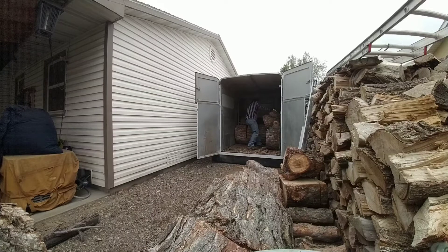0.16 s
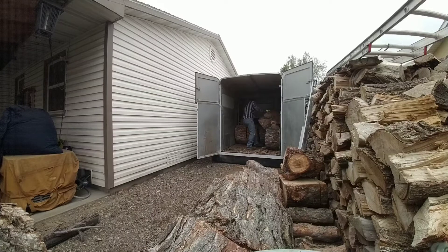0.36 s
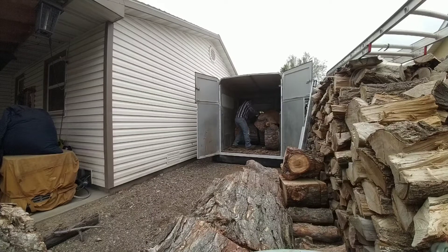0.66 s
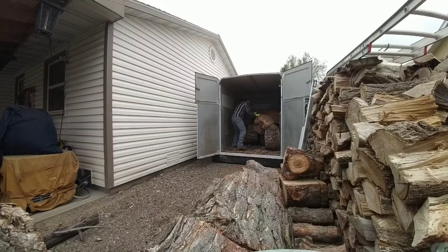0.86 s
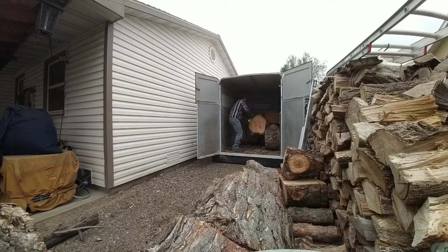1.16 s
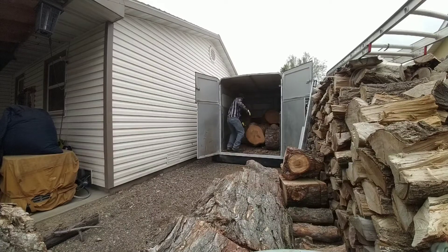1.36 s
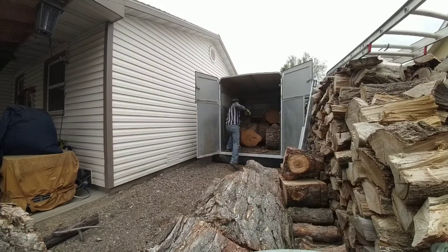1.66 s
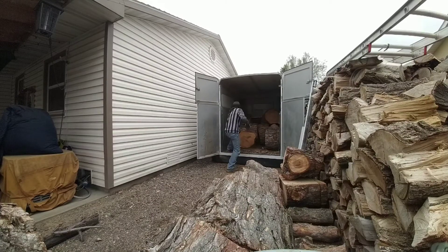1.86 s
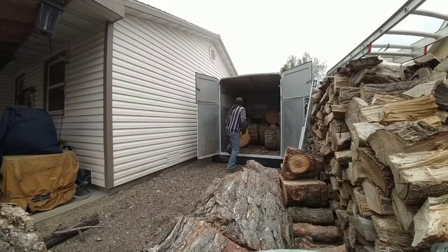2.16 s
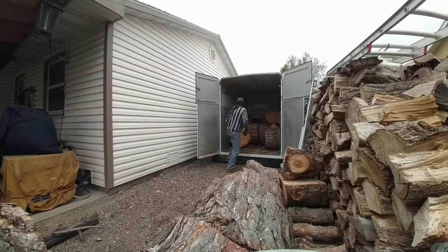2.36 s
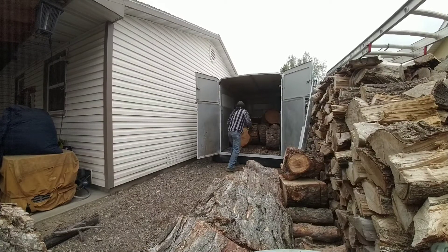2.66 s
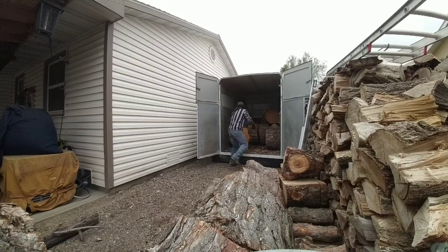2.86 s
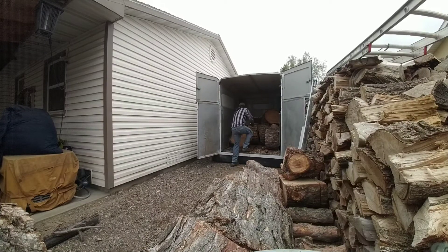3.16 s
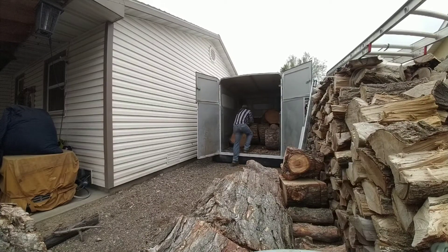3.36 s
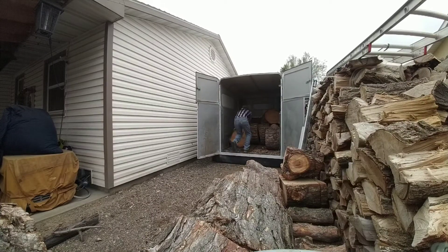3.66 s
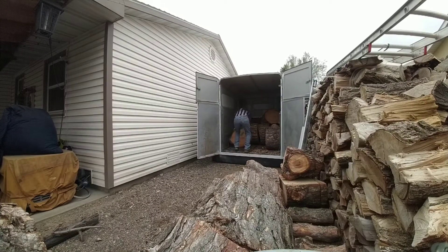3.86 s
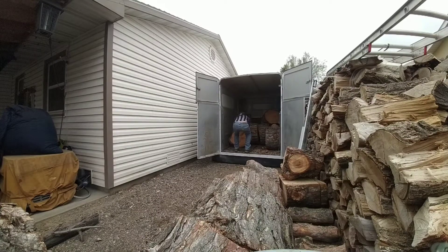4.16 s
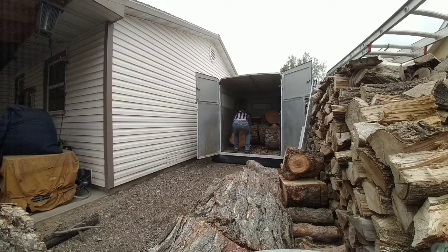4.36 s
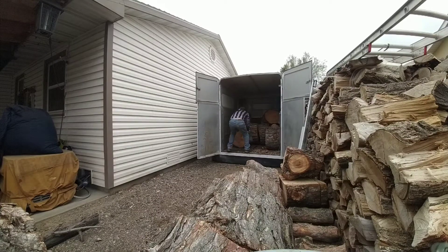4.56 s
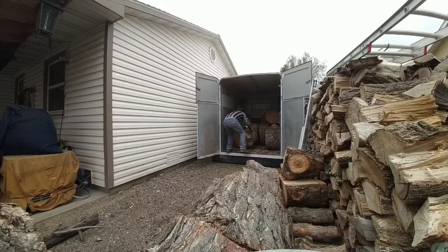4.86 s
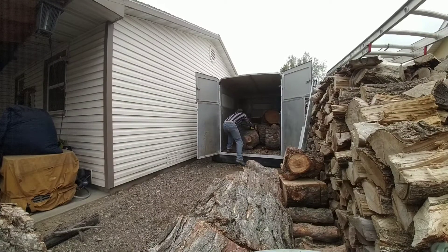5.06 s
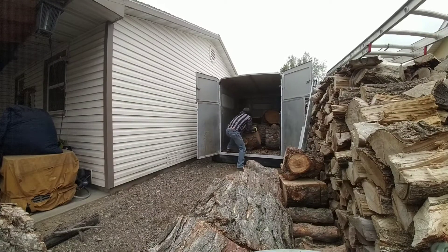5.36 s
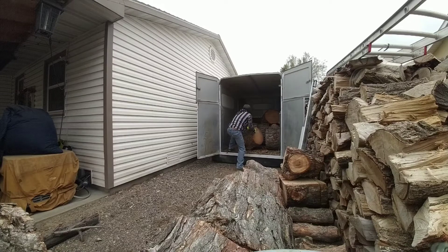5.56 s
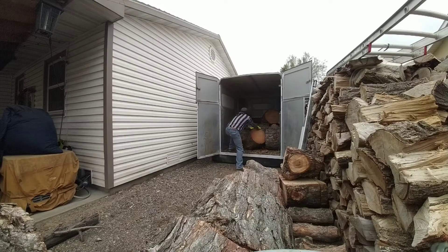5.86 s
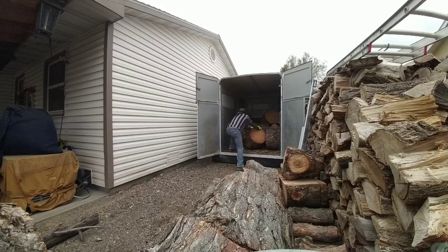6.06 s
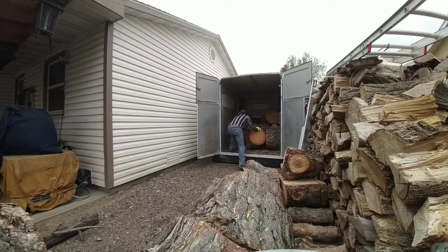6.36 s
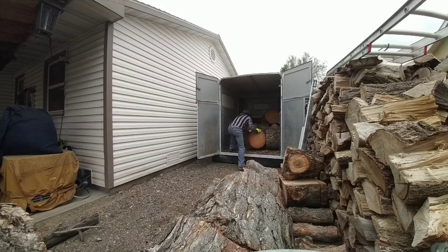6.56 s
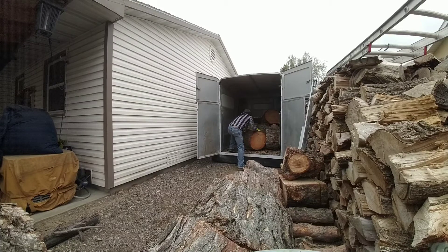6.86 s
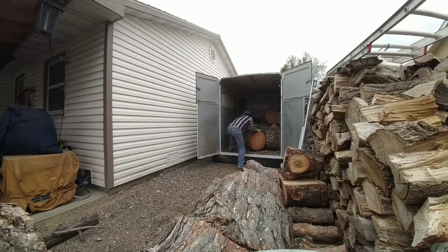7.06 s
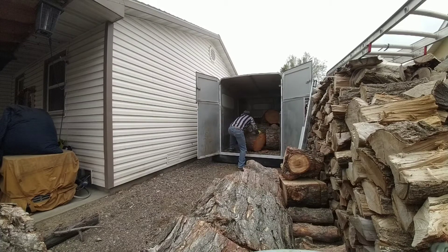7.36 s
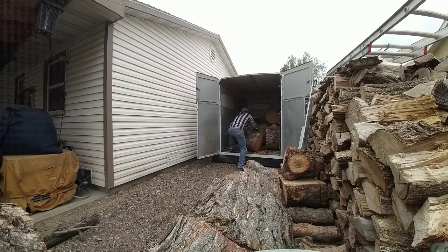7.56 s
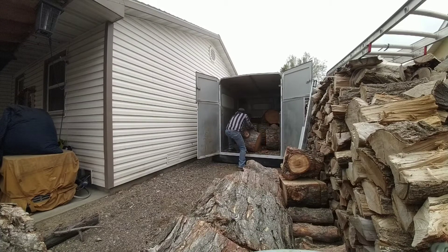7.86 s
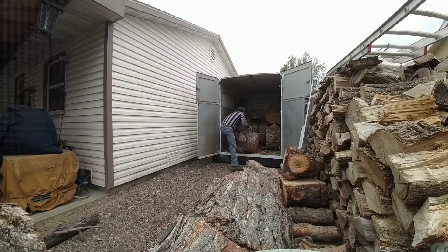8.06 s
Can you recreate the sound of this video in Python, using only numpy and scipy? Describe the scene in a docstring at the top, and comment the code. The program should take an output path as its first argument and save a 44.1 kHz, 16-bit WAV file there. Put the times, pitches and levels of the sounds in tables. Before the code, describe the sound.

Outdoors, at a distance from an open box trailer, soft low air noise and a faint far engine hum run throughout. From about 0.1 to 1.4 s, heavy wood drags and starts rolling: gritty bark scrapes, low floor bumps and dry snaps. At about 1.5 s a loud crack and heavy thud hit the hollow floor, with deep rumbling; further booms come around 1.7 and 1.9 s, and the strongest near 2.1 s, tumbling on to 2.4 s with short boxy echoes. A loose metal part rattles lightly at 2.5-2.9 s. The hum dips in pitch around 2.5 s, then climbs back. Softer knocks and scuffs come at 3.2 and 3.9 s, a sharp snap at 4.6 s, a cluster of clicks and scrapes around 5.2 s, and two faint creaks near 5.5-5.7 s. Small thumps follow at 5.9 and 6.5 s, then sparse ticks, rubs and low bumps until about 8.2 s.

```python
"""Log rounds worked on a box trailer's floor, across a yard: air noise, far engine hum dipping then rising in pitch.
0-1.4 s: dragging and rolling begin (shaken floor modes, scraped bark modes) under snaps (noise bursts).
1.5-2.4 s: the heaviest thuds (contact pulses through floor modes) and rumble; the box echoes (delay loops).
2.5-2.9 s: a loose metal part rattles (decaying sines); then sparser thuds, scrapes and snaps,
with two faint creaks (gliding sines) near 5.5 s."""
import sys
import numpy as np
from scipy import signal
from scipy.io import wavfile
from scipy.ndimage import uniform_filter1d

SR = 44100
rng = np.random.default_rng(int(sys.argv[2]) if len(sys.argv) > 2 else 0)


def store_wav(level_fs):
    """Save 16-bit WAV to argv[1]."""
    pcm = np.round(np.clip(np.atleast_2d(level_fs), -1, 1) * 32767)
    wavfile.write(sys.argv[1], SR, pcm.T.astype(np.int16))


N = 362061


def from_db(db):
    """Decibels to gain."""
    return 10 ** (np.asarray(db) / 20)


def rms_one(x):
    """Scale to unit rms."""
    return x / np.sqrt(np.mean(x ** 2) + 1e-20)


def in_time(rows):
    """Columns of a timed table, interpolated to one value a sample."""
    s, *columns = np.transpose(rows)
    return [np.interp(np.arange(N) / SR, s, c) for c in columns]


def drift(rate_hz):
    """Slow random curve of unit rms: low-passed noise made at SR / 40."""
    r = np.exp(-80 * np.pi * rate_hz / SR)
    noise = rng.standard_normal(N // 40 + 2002)
    slow = signal.lfilter([1], [1, -2 * r, r * r], noise)[2000:]   # settling dropped
    return np.interp(np.arange(N) / 40, np.arange(len(slow)), rms_one(slow))


def resonate(x, hz, width_hz):
    """One two-pole resonance with unit peak gain."""
    r = np.exp(-np.pi * width_hz / SR)
    zeros = np.array([1, 0, -1]) * (1 - r * r) / 2
    poles = [1, -2 * r * np.cos(2 * np.pi * hz / SR), r * r]
    return signal.lfilter(zeros, poles, x)


def body(x, modes):
    """Resonances in parallel, signs alternating."""
    return sum((-1) ** k * from_db(db) * resonate(x, hz, width)
               for k, (hz, width, db) in enumerate(modes))


def cut(x, hz, kind):
    """Second-order high- or low-pass."""
    hz = np.clip(hz, 20, .45 * SR)
    return signal.sosfilt(signal.butter(2, hz, kind, fs=SR, output="sos"), x)


def grains(per_s, spread_db):
    """Random contacts of uneven size and sign, at unit rms."""
    sizes = from_db(spread_db * np.minimum(rng.exponential(1, N), 5))
    signed = sizes * rng.choice([-1, 1], N)
    return rms_one(signed * (rng.random(N) < per_s / SR) + 1e-18)


def evened(x, span_s):
    """Partly level the chance swells, so that the load sets the loudness; unit rms."""
    power = uniform_filter1d(x ** 2, round(span_s * SR))
    return rms_one(x / (power + 1e-3) ** 0.12)


def add(out, s, sound):
    """Mix a short sound in at time s."""
    i = round(s * SR)
    out[i:i + len(sound)] += sound[:N - i]


SLOW_START = 0.14   # share of the held time added to the rise


def swells(steady_db, start_s, held_s, peak_db, min_rise_s, fade_db_per_s):
    """Gain over time: each event rises, holds and fades; powers add to the steady level."""
    power, t = from_db(2 * steady_db), np.arange(SR) / SR
    for s, hold, db in zip(start_s, held_s, peak_db):
        rise = np.minimum(t / (min_rise_s + SLOW_START * hold), 1)
        fade_db = fade_db_per_s * np.maximum(t - min_rise_s - hold, 0)
        add(power, s, (rise * from_db(db - fade_db)) ** 2)
    return np.sqrt(power)


# air noise density: (f/Hz, relative level per Hz/dB)
AIR_SPECTRUM = [(15, -36), (25, -24), (48, -12.5), (70, -3.5), (108, -6.5), (363, -16), (1520, -36),
                (5430, -36.5), (14800, -38.5), (16000, -40)]
AIR_RMS_DB = -50


def air():
    """Steady outdoor noise in half-octave bands, each swaying gently."""
    out, edges_hz, table = 0, 22 * 2 ** np.arange(0, 9.6, .5), np.array(AIR_SPECTRUM)
    white = rng.standard_normal((2, N))
    for k, (low, high) in enumerate(zip(edges_hz, edges_hz[1:])):
        bandpass = signal.butter(2, [low, high], "band", fs=SR, output="sos")
        band = signal.sosfilt(bandpass, white[k % 2])
        db = np.interp(np.log(low * high) / 2, np.log(table[:, 0]), table[:, 1])
        out = out + from_db(db + 0.19 * drift(15)) * band
    return from_db(AIR_RMS_DB) * rms_one(out)


# far engine: (t/s, firing f/Hz, first-order rms level/dB, second-order rms level/dB)
ENGINE_ORDERS = [(0, 61.2, -39, -75), (2.5, 50.76, -78, -37.5), (2.95, 52.56, -36.5, -61),
                 (3.4, 53.94, -33, -52.5), (4.1, 57.65, -39, -46), (4.6, 59.57, -42, -51.5),
                 (5.2, 59.05, -41, -63), (6.0, 60.5, -45.5, -51), (7.0, 61.67, -45.5, -110),
                 (8.21, 61.9, -63, -69)]


def engine():
    """The two lowest orders carry over the distance, wavering a little in pitch and level."""
    hz, first_db, second_db = in_time(ENGINE_ORDERS)
    phase = 2 * np.pi * np.cumsum(hz * (1 + .007 * drift(4))) / SR
    first = from_db(first_db + 1.5 * drift(4)) * np.sin(phase)
    second = from_db(second_db + 3 * drift(9)) * np.sin(2 * phase)
    return np.sqrt(2) * (first + second)   # rms to peak


# wood under load: (t/s, length/s, start f/Hz, end f/Hz, peak level/dB)
CREAK_GLIDES = [(5.522, 0.13, 1850, 1710, -54), (5.65, 0.044, 1630, 1950, -54)]


def creaks():
    """Short wavering tones that swell and fade."""
    out, waver = np.zeros(N), drift(3.3)
    for s, length_s, start_hz, end_hz, db in CREAK_GLIDES:
        hz = np.linspace(start_hz, end_hz, round(length_s * SR))
        hz = hz * (1 + 0.015 * waver[round(s * SR):][:len(hz)])
        tone = np.sin(2 * np.pi * np.cumsum(hz) / SR)
        add(out, s, from_db(db) * np.sqrt(np.hanning(len(hz))) * tone)
    return out


# loose metal part touched as the log settles: (t/s, level/dB)
RATTLE_TOUCHES = [(2.547, -41), (2.651, -45), (2.691, -41), (2.752, -47), (2.854, -44)]
# its modes: (f/Hz, relative level/dB, t60/s)
METAL_MODES = [(2550, -4.5, 0.09), (1680, -13, 0.065), (1140, -1, 0.063)]


def rattles():
    """Each touch rings the part's few modes, each with a random strength."""
    out, t = np.zeros(N), np.arange(SR // 5) / SR
    chance = rng.standard_normal((len(RATTLE_TOUCHES), len(METAL_MODES)))
    for (s, db), lucks in zip(RATTLE_TOUCHES, chance):
        for (hz, mode_db, t60), luck in zip(METAL_MODES, lucks):
            decay = from_db(db + mode_db + 1.7 * luck - 60 * t / t60)
            add(out, s, decay * np.sin(2 * np.pi * hz * t))
    return out


# bark and splinters: (t/s, level/dB before a common -13 dB, f/Hz, t60/s, crackle over wood/dB)
SNAP_EVENTS = [(0.312, -11.5, 1400, 0.061, -1), (0.596, -27, 3210, 0.09, -3), (0.65, -21, 3820, 0.096, 9),
               (0.682, -7, 2950, 0.044, -8), (0.727, -12, 1510, 0.043, -15), (0.929, -17, 1880, 0.17, -21),
               (1.035, -13, 1900, 0.056, -5), (1.098, -9.5, 2540, 0.089, -10), (1.236, -17, 2470, 0.1, -12),
               (1.3034, -8, 1450, 0.047, -29), (1.36, -11.5, 2900, 0.1, 11), (1.416, -10, 3040, 0.055, -3),
               (1.447, -12, 3370, 0.046, -18), (1.4674, 4, 1800, 0.069, -14), (1.507, -7, 2930, 0.21, -16),
               (1.5395, -6, 1680, 0.19, 0.5), (1.636, -6, 970, 0.12, -25), (1.7113, -11, 1850, 0.12, 0),
               (2.001, -16.5, 1730, 0.13, -1), (2.052, -7.5, 1960, 0.1, 0), (2.147, -6, 2200, 0.12, -14),
               (2.185, -8.5, 1680, 0.056, -0.5), (2.241, -6, 855, 0.1, -7), (2.3218, -7.5, 1400, 0.1, -1),
               (3.2204, -18, 1060, 0.07, -10), (3.5703, -21, 2230, 0.056, 7), (3.588, -18, 2180, 0.052, 3),
               (3.673, -24.5, 2250, 0.097, 2.5), (3.775, -27, 2450, 0.023, 11.5),
               (3.782, -27.5, 800, 0.068, 0), (3.795, -23, 2450, 0.051, 5), (3.9148, -17, 1670, 0.17, -18),
               (4.0118, -23, 3640, 0.34, 0.5), (4.173, -30, 1750, 0.1, 8), (4.3, -47, 1510, 0.057, 14),
               (4.5593, -11.5, 3300, 0.055, -4), (4.561, -19, 2200, 0.074, -20),
               (4.639, -36.5, 1600, 0.33, 17), (4.855, -21, 1890, 0.079, -2), (4.909, -23, 2720, 0.12, -2),
               (4.953, -19.5, 2380, 0.071, -23), (5.041, -22.5, 2300, 0.08, -49),
               (5.1226, -24.5, 2434, 0.39, 0), (5.1572, -9.5, 2390, 0.021, -18),
               (5.1635, -7, 2270, 0.048, -25), (5.18, -14.5, 4600, 0.048, -1), (5.2481, -14, 2300, 0.02, 7),
               (5.2593, -19, 3450, 0.015, -4), (5.3386, -29.5, 2550, 0.12, 11),
               (5.521, -32, 1773, 0.072, 7), (5.6152, -24.5, 3170, 0.13, -11),
               (5.6395, -28.5, 1625, 0.15, 16), (5.7676, -21, 2200, 0.06, -20),
               (5.91, -23.5, 2400, 0.036, -20), (6.031, -30, 2380, 0.036, -7),
               (6.102, -41, 2400, 0.12, 20.5), (6.1599, -23.5, 2490, 0.044, -24),
               (6.499, -16.5, 1590, 0.042, -27), (6.5455, -16, 2220, 0.04, -19),
               (7.1085, -33, 2780, 0.041, -9), (7.183, -22.5, 3170, 0.036, -20),
               (7.187, -21.5, 2000, 0.085, -26), (7.2493, -24, 2250, 0.23, -1),
               (7.447, -23, 1500, 0.033, -3), (7.472, -20, 1500, 0.027, -4), (7.548, -16.5, 3830, 0.023, 4),
               (7.643, -22, 1920, 0.075, -6), (7.7462, -29, 2370, 0.04, 3), (7.8532, -42, 1510, 0.052, 12),
               (7.945, -36, 1810, 0.056, 10), (8.089, -19.5, 2440, 0.05, 6.5)]
SNAP_TRIM_DB, CRACKLE_RISE_S = -13, .003


def snaps():
    """A short burst: part rings two modes of the wood, part is bright crackle of its own colour."""
    out, t = np.zeros(N), np.arange(SR // 5) / SR
    # (crackle f/Hz, upper mode over lower)
    colours = rng.uniform([5500, 1.3], [20000, 1.7], (len(SNAP_EVENTS), 2))
    noises = rng.standard_normal((len(SNAP_EVENTS), 2, SR // 5))
    for (s, db, hz, t60, crackle_db), noise, (crackle_hz, upper) in zip(SNAP_EVENTS, noises, colours):
        fibres = noise * np.abs(noise) / 2 * from_db(-60 * t / t60)   # squaring makes them uneven
        wood, crackle = fibres + 4 * (t == 0)   # the break itself is a click
        lower_mode = resonate(wood, hz, 0.2 * hz)
        wood = lower_mode - from_db(-6) * resonate(wood, upper * hz, 0.25 * hz)
        crackle = cut(crackle * (1 - np.exp(-t / CRACKLE_RISE_S)), 2300, "high")
        crackle = resonate(crackle, crackle_hz, 7500)
        burst = wood / np.abs(wood).max() + from_db(crackle_db) * crackle / np.abs(crackle).max()
        add(out, s, from_db(db + SNAP_TRIM_DB) * burst)
    return out


# how hard the wood is worked: (t/s, floor rumble level/dB, bark scrape level/dB); also drives rolling()
WORK_LEVELS = [(0, -49.5, -57.5), (0.18, -57.5, -50.5), (0.3, -39.5, -41), (1.0, -44.5, -43),
               (1.45, -43, -37.5), (1.475, -19.5, -33), (1.76, -23.5, -35), (1.99, -35.5, -50.5),
               (2.12, -31, -36), (2.16, -23, -30.5), (2.33, -21.5, -40), (2.55, -35, -50), (2.93, -56, -54),
               (4.8, -56, -55.5), (5.3, -46.5, -49.5), (6.1, -50, -54), (6.9, -57.5, -56),
               (7.45, -48.5, -50), (7.9, -55, -58), (8.21, -42.5, -47.5)]
# bark over wood and metal: (t/s, held/s, scrape level/dB, hiss over scrape/dB)
RUB_EVENTS = [(0.13, 0.044, -47.5, -5), (0.204, 0.023, -37, -2), (0.27, 0.035, -36, -5),
              (0.678, 0.0041, -34.5, 3), (0.72, 0.045, -35.5, -2.5), (0.845, 0.033, -32.5, -5.5),
              (1.02, 0.11, -36, -5), (1.089, 0.016, -37.5, 4.5), (1.21, 0.016, -49, 7.5),
              (1.251, 0.021, -35.5, -19), (1.303, 0.014, -51, -24), (1.362, 0.13, -42, 8.5),
              (1.9, 0.017, -37.5, -8), (2.0, 0.037, -46.5, -1), (2.034, 0.057, -34.5, -3.5),
              (2.26, 0.061, -48, -3), (2.68, 0.028, -54, -15), (3.218, 0.0087, -41.5, 2.5),
              (3.57, 0.021, -53.5, 3.5), (3.912, 0.021, -51, 2), (4.065, 0.032, -48, 3),
              (4.168, 0.0051, -45.5, 1.5), (4.449, 0.14, -52.5, 2), (4.559, 0.06, -47.5, -0.5),
              (4.85, 0.087, -48, 1.5), (5.148, 0.02, -39, 3.5), (5.248, 0.0075, -46, 4),
              (5.31, 0.079, -52, -2), (5.631, 0.13, -47.5, -10), (5.739, 0.073, -47, -8),
              (5.869, 0.15, -52.5, -1), (6.463, 0.013, -47.5, -4.5), (6.497, 0.026, -44, -3.5),
              (6.544, 0.011, -37.5, -4.5), (7.18, 0.014, -48, -14), (7.372, 0.13, -50, -3),
              (7.543, 0.006, -42, -1), (7.64, 0.025, -44.5, -14), (8.085, 0.055, -43.5, -1)]
# bark and wood under a scrape: (f/Hz, width/Hz, relative level/dB)
SCRAPE_MODES = [(720, 380, 7), (1000, 360, 7.5), (1400, 350, 8), (1850, 420, 7.5), (2300, 590, -0.5),
                (2650, 910, 3.5), (3380, 550, -2.5)]
# edges of the bands in which grit hisses: f/Hz
GRIT_EDGES_HZ = [3820, 4760, 8500, 11100, 17600]
HISS_OVER_SCRAPE_DB = -4.5   # between rubs
CHIPS_PER_S, CHIPS_DB = 81, -12   # loose bark knocking about, level against slips or grit
PATCHY_DB = 3   # rms swell of each bark mode
RUB_MIN_RISE_S, RUB_FADE_DB_PER_S = .008, 282


def dragging():
    """Dense slips and loose chips ring the bark's modes by turns; the finest grit hisses in patches."""
    work_db = in_time(WORK_LEVELS)[1]
    s, hold, scrape_db, hiss_db = np.transpose(RUB_EVENTS)
    clumps = drift(19)
    grit = grains(9000., spread_db=2.0) + from_db(CHIPS_DB) * grains(150., spread_db=4.0)
    slips = grains(3500., spread_db=2.0) + from_db(CHIPS_DB) * grains(CHIPS_PER_S, spread_db=4.5)

    scrape = 0
    for k, (hz, width, db) in enumerate(SCRAPE_MODES):
        contacts = np.roll(slips, k * N // 8)   # different contacts per mode
        swell = from_db(db + PATCHY_DB * drift(14.5))
        scrape = scrape + (-1) ** k * swell * resonate(contacts, hz, width)
    scrape = evened(rms_one(cut(scrape, 5300, "low")), 0.086)

    hiss = 0
    for low, high in zip(GRIT_EDGES_HZ, GRIT_EDGES_HZ[1:]):
        patches = from_db(1.0 * clumps + 2.8 * drift(9.9))
        hiss = hiss + patches * cut(cut(grit, low, "high"), high, "low")
    hiss = evened(rms_one(hiss), 0.12)

    shape = RUB_MIN_RISE_S, RUB_FADE_DB_PER_S
    hiss = hiss * swells(work_db + HISS_OVER_SCRAPE_DB, s, hold, scrape_db + hiss_db, *shape)
    return hiss + scrape * swells(work_db, s, hold, scrape_db, *shape)


# weight shifting onto the floor: (t/s, held/s, boom level/dB, rumble level/dB)
LURCH_EVENTS = [(0.13, 0.05, -44, -67), (0.21, 0.022, -25.5, -46), (0.27, 0.035, -33, -42),
                (0.36, 0.037, -29.5, -45), (0.565, 0.035, -27, -35), (1.05, 0.071, -34.5, -37),
                (1.22, 0.035, -34, -38), (1.36, 0.033, -33, -31.5), (1.46, 0.0082, -10, -10.5),
                (1.72, 0.1, -18, -47), (1.919, 0.059, -17, -35.5), (2.13, 0.017, -12.5, -27),
                (2.22, 0.022, -33, -36), (2.36, 0.077, -19, -30), (2.55, 0.23, -30.5, -58),
                (2.971, 0.035, -38, -41), (3.221, 0.035, -25.5, -36.5), (3.52, 0.016, -42, -45),
                (3.76, 0.058, -49, -47), (3.909, 0.03, -30, -33.5), (5.151, 0.11, -47, -40),
                (5.39, 0.071, -38, -44), (5.638, 0.044, -38, -59), (5.87, 0.074, -31, -44),
                (6.05, 0.049, -41, -43), (6.489, 0.074, -46, -43), (6.669, 0.076, -49, -44),
                (6.9, .12, -44, -71), (7.44, 0.04, -53, -39.5), (7.6, 0.059, -39, -62),
                (8.13, 0.1, -44, -42)]
# floor and walls as a drum: (f/Hz, width/Hz, relative level/dB); also rung by thuds()
DRUM_MODES = [(41, 3.1, -27), (51.56, 2.66, 8.5), (67.9, 8.6, 0), (80.5, 12.2, -4.5)]
# planks and panels: (f/Hz, width/Hz, relative level/dB); also rung by thuds()
PLANK_MODES = [(108, 15, -10), (146, 57.5, 9), (191.3, 27, -6), (275, 3.5, 7), (315, 56, 3), (393, 70, 1.5),
               (500, 76, -8), (602, 320, -5), (799, 110, -8.5), (940, 360, -16.5), (1450, 650, -14.5)]
BOOM_OVER_RUMBLE_DB = 2   # between lurches
BOOM_MIN_RISE_S, BOOM_FADE_DB_PER_S = 0.031, 230
RUMBLE_MIN_RISE_S, RUMBLE_FADE_DB_PER_S = 0.0035, 281


def rolling():
    """Bark ridges bump over the floor and shake its drum and plank modes."""
    work_db = in_time(WORK_LEVELS)[0]
    s, hold, boom_db, rumble_db = np.transpose(LURCH_EVENTS)
    boom = evened(rms_one(body(grains(300., spread_db=1.5), DRUM_MODES)), 0.056)
    knocks = grains(4000., spread_db=1.5) + from_db(-7) * grains(50., spread_db=4.0)
    # three interleaved mode groups sway separately
    rumble = sum(from_db(1.5 * drift(9.0)) * body(knocks, PLANK_MODES[k::3]) for k in range(3))
    rumble = evened(rms_one(rumble), 0.0224)
    boom_gain = swells(work_db + BOOM_OVER_RUMBLE_DB, s, hold, boom_db,
                       BOOM_MIN_RISE_S, BOOM_FADE_DB_PER_S)
    rumble_gain = swells(work_db, s, hold, rumble_db, RUMBLE_MIN_RISE_S, RUMBLE_FADE_DB_PER_S)
    return boom * boom_gain + rumble * rumble_gain


# logs and boots landing: (t/s, direct contact level/dB, judder cutoff f/Hz, judder t60/s,
# judder level/dB before a common +10 dB); the contact pulse peaks at 0.75 f
THUD_EVENTS = [(0.375, -33.5, 800, 0.081, -4.5), (0.564, -29.5, 500, 0.088, -5.5),
               (0.606, -21.5, 327, 0.05, -15), (1.299, -22, 1240, 0.3, -20), (1.465, -17.5, 1350, 0.1, -5),
               (1.485, -8, 70, 0.1, -35), (1.616, -22, 400, 0.08, -8), (1.724, -16, 400, 0.063, -10.5),
               (2.129, 1.5, 197, 0.17, -40), (2.153, -10, 78.5, 0.1, -35), (2.232, -14.5, 500, 0.39, -13),
               (2.309, -19, 397, 0.12, -8), (2.789, -33.5, 397, 0.19, -10.5), (2.975, -35, 830, 0.08, -11),
               (3.221, -37, 1010, 0.17, -6), (3.258, -30, 59.5, 0.1, -28), (3.523, -44, 710, 0.13, -9),
               (3.912, -25, 400, 0.17, -30), (3.9144, -45.5, 2190, 0.67, -8), (5.16, -37, 890, 0.19, -30),
               (5.314, -42, 1100, 0.33, -7.5), (5.42, -38, 1090, 0.13, -6), (5.502, -37, 411, 0.13, -12.5),
               (5.636, -29, 192, 0.2, -15), (5.869, -22.5, 2010, 0.13, -24.5),
               (6.072, -36, 1450, 0.23, -15), (6.497, -26, 1836, 0.1, -17.5),
               (7.337, -45.5, 623, 0.44, -7.5), (8.141, -42, 602, 0.73, -5)]
JUDDER_TRIM_DB = 10.0


def thuds():
    """A rounded push and its judder, heard directly and through the floor's modes."""
    push, t = np.zeros(N), np.arange(SR // 2) / SR
    noises = rng.standard_normal((len(THUD_EVENTS), SR // 2))
    for (s, db, hz, t60, judder_db), noise in zip(THUD_EVENTS, noises):
        u = (np.pi * (.75 * hz * t - .8)) ** 2
        contact = (1 - 2 * u) * np.exp(-u)   # air feels the acceleration of a smooth contact
        judder = rms_one(cut(cut(noise, hz, "low"), 61, "high"))
        judder = judder * from_db(judder_db + JUDDER_TRIM_DB - 60 * t / t60)
        add(push, s, from_db(db) * (contact + judder))
    planks = from_db(-8) * body(push, PLANK_MODES)
    drum = from_db(2.5) * body(push, DRUM_MODES)
    return push + planks + drum


BOX_T60_S, BOX_CUT_HZ, BOX_DB = .3, 5000, -19   # t60 at low f; higher f dies sooner


def box(x):
    """Eight feedback delays between the walls, duller on every round."""
    out, dull = np.zeros(N), np.exp(-2 * np.pi * BOX_CUT_HZ / SR)
    lags = (rng.uniform(.013, .036, 8) * SR).astype(int)
    for k, lag in enumerate(lags):
        loop, gain, state = x.copy(), from_db(-60 * lag / SR / BOX_T60_S), [0.]
        for i in range(lag, N, lag):
            back, state = signal.lfilter([gain * (1 - dull)], [1, -dull], loop[i - lag:i], zi=state)
            loop[i:i + lag] += back[:N - i]
        out += (loop - x) * (-1) ** k   # echoes only
    return out


def scene():
    """Mix all sources, alike in both channels; only the hits echo in the box."""
    hits = thuds() + snaps() + rattles()
    echoes = from_db(BOX_DB) * box(hits)
    mix = hits + echoes + rolling() + dragging() + creaks() + engine() + air()
    return np.array([mix, mix])


# treble difference between channels, wider later on: (t/s, level/dB)
TREBLE_WIDTH = [(0, -51), (3.5, -46), (3.8, -13), (5.6, -9), (6.8, -18), (8.21, -19)]
CUTOFF_HZ = 15900


def record(dry):
    """Peaks are rounded, the deepest bass is lost, the treble differs between channels, the top is cut."""
    mid = .75 * np.tanh(cut(dry.mean(axis=0), 41, "high") / .75)
    smear = rng.standard_normal(200) / np.sqrt(200)
    treble = signal.sosfilt(signal.cheby2(8, 60, 3600, "high", fs=SR, output="sos"), mid)
    width = from_db(in_time(TREBLE_WIDTH)[0] + 7.1 * drift(8.3))
    side = width * np.convolve(treble, smear)[:N]
    top_cut = signal.ellip(12, .5, 75, CUTOFF_HZ, fs=SR, output="sos")
    return signal.sosfilt(top_cut, [mid + side, mid - side])


dry = scene()
out = record(dry)
store_wav(out)
```